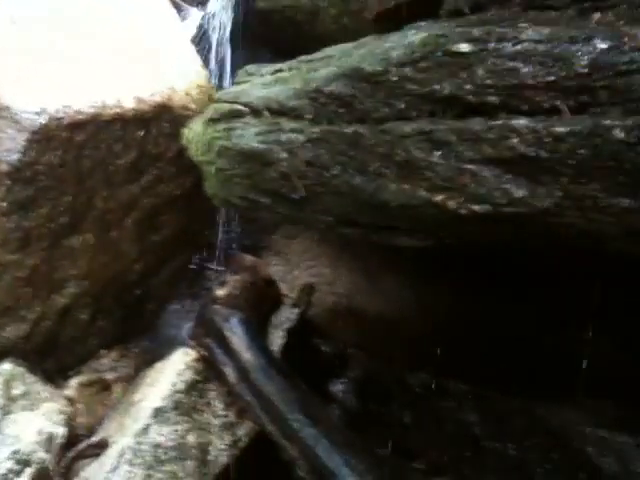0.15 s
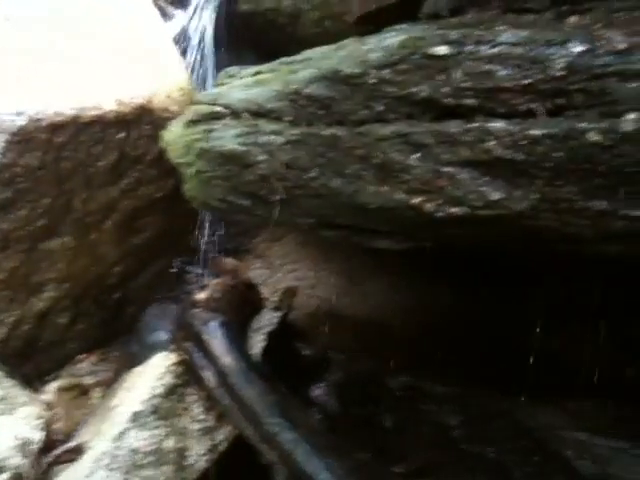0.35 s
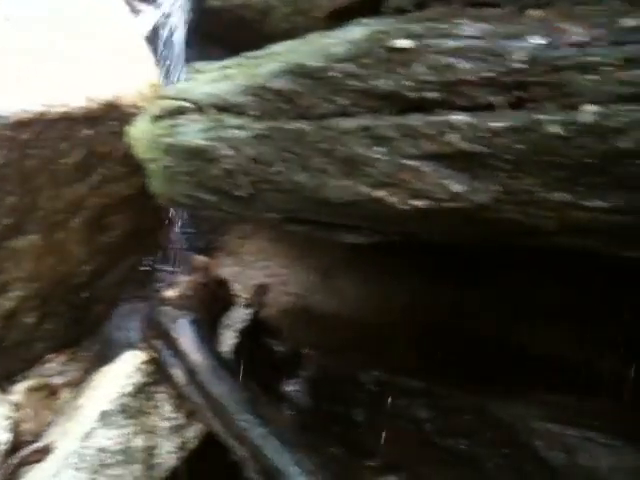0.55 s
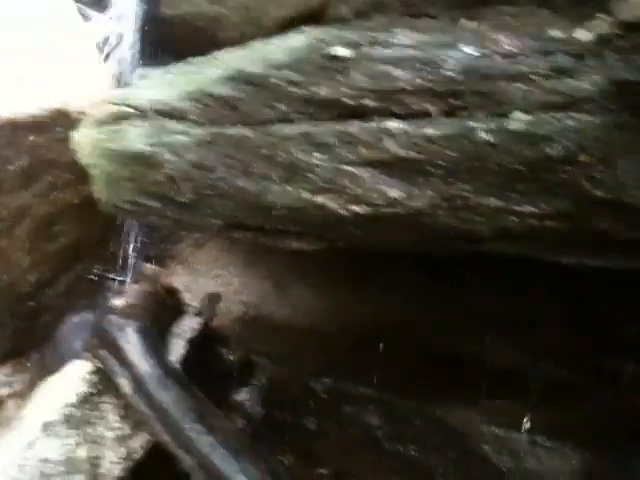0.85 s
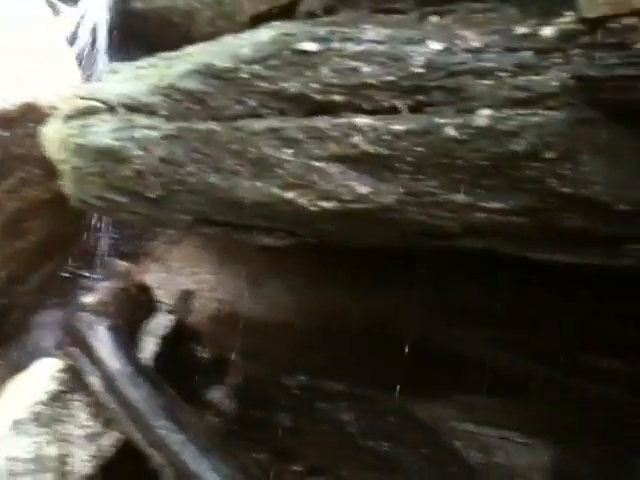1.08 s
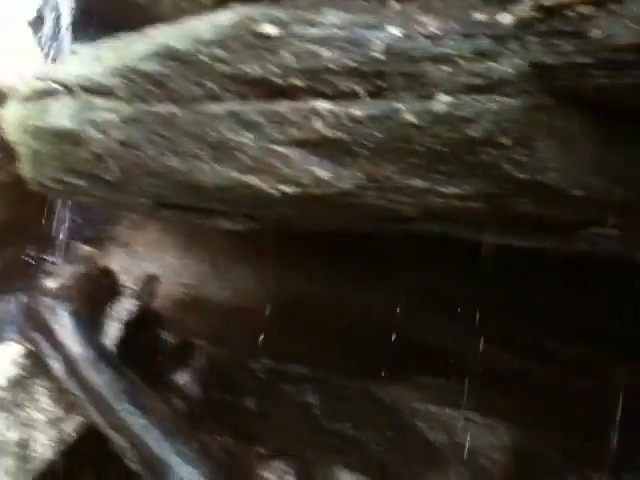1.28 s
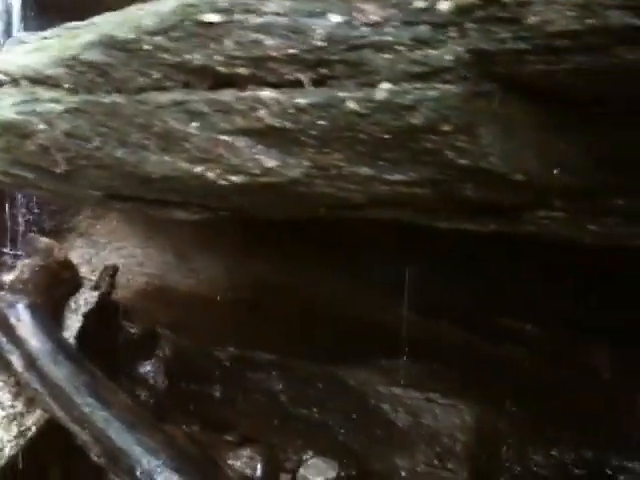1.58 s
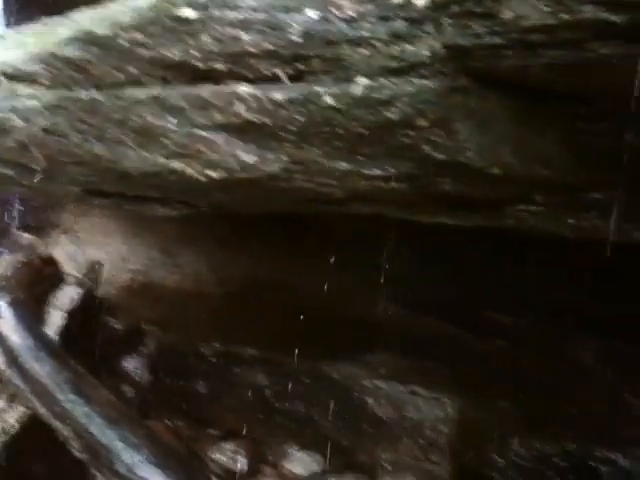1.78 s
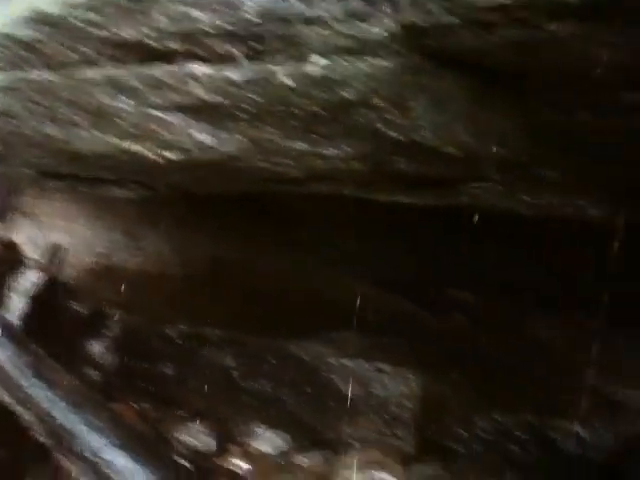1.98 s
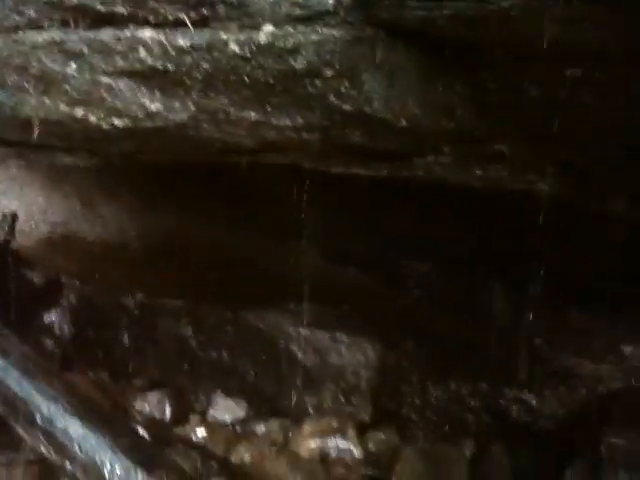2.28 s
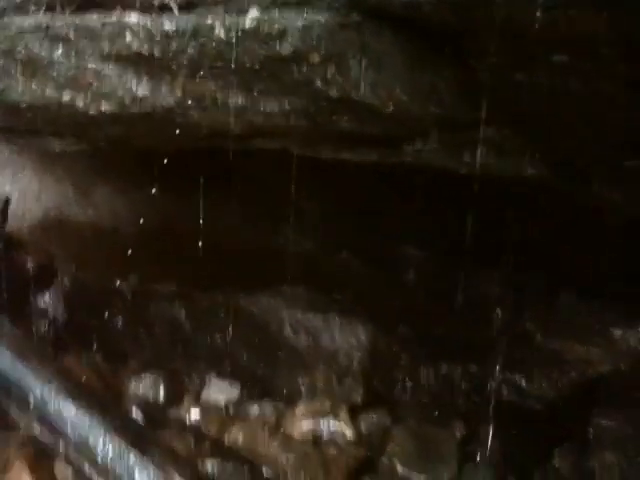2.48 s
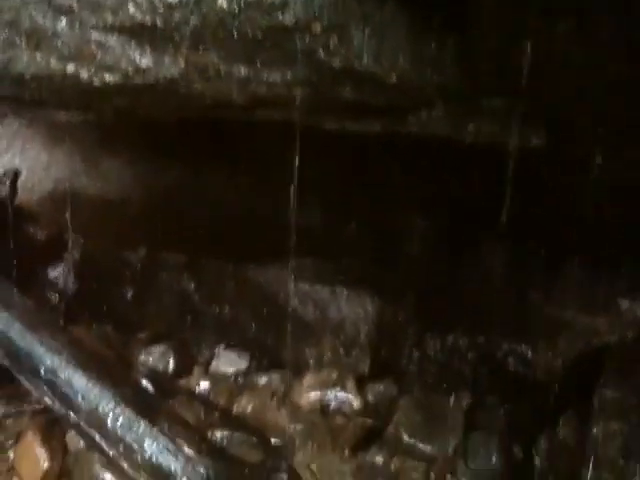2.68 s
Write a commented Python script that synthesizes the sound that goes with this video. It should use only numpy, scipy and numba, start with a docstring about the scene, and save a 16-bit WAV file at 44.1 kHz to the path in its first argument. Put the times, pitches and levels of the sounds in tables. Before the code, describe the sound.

Close trickle of water onto wet stones, fizzy and splashing, with clicking drips and small bubble plops

```python
"""Spring water on wet stones

Spring water trickles off a rock ledge onto wet stones close to a phone.
Shaped noise and thousands of damped sines make the hiss, spray, fizz and clear bubbles of the trickle.
Single drops smack the stones as short sines with an echo and a noise spatter; bubbles plop and gurgle
as gliding sines. Faint low thumps and a brief hum lie beneath."""
import sys
import numpy as np
from scipy import signal
from scipy.fft import rfft, irfft
from scipy.io import wavfile
from scipy.ndimage import uniform_filter1d
from numba import njit

SR = 44100
rng = np.random.default_rng(int(sys.argv[2]) if len(sys.argv) > 2 else 0)


def waveform_to_disk(signal):
    """Save audio, clipped to [-1, 1], as 16-bit WAV at the path in sys.argv[1]."""
    frames = np.transpose(np.atleast_2d(signal))
    scaled = np.clip(frames, -1, 1) * 32767
    samples = np.round(scaled).astype(np.int16)
    wavfile.write(sys.argv[1], SR, samples)


N = 125685  # samples


def undb(db):
    """Decibels: amplitude ratio is a power of ten of level over 20."""
    return 10 ** (np.asarray(db) / 20)


def level(x, db):
    """Root-mean-square level: scale a signal to the given rms in dB."""
    return x * undb(db) / np.sqrt(np.mean(x ** 2))


@njit
def grains(n, start, step, cycles, glide, rise, size):
    """Damped oscillation: sines decay 60 dB over their cycles while their pitch glides upward."""
    out = np.zeros(n)
    for k in range(len(start)):
        first = int(start[k])
        length = cycles[k] / step[k]  # samples; step is cycles per sample
        for j in range(min(int(length), n - first - 1)):
            age = j + 1 - (start[k] - first)  # samples, exact to a fraction
            cycle = age * step[k]
            decay = np.exp(-np.log(1000) * age / length)
            envelope = decay * min(cycle / rise, 1.)
            phase = 2 * np.pi * cycle * (1 + glide[k] * age / length)
            out[first + 1 + j] += size[k] * envelope * np.sin(phase)
    return out


def band(x, hz, width_hz):
    """Resonance: a second-order band-pass favours the sound near its centre."""
    b, a = signal.iirpeak(min(hz, .45 * SR), hz / width_hz, fs=SR)
    return signal.lfilter(b, a, x)


def walk(rate):
    """Random modulation: levels held 1 / rate s, smoothed twice, with zero mean and unit deviation."""
    hold = int(SR / rate)
    steps = np.repeat(rng.standard_normal(N // hold + 1), hold)
    smooth = uniform_filter1d(uniform_filter1d(steps, hold), hold)[:N]
    return (smooth - smooth.mean()) / smooth.std()


# Relative spectrum of the falling water as heard in the hollow
# columns: frequency_hz [Hz], level_db [dB per Hz]
WATER_SPECTRUM = [(24, -60), (50, -53), (80, -40), (110, -29.5), (197, -15), (267, -14.5), (401, -18),
                  (616, -13.5), (972, -12.5), (2080, -6), (3040, -5.5), (4000, -2.5), (5200, 0),
                  (6000, -1.5), (6900, -4), (7900, -9), (9700, -8), (12200, -9.5), (14600, -16),
                  (15500, -21), (17000, -44)]


def colour(x, low_hz):
    """Spectral shaping: flatten the long-term spectrum, impose the water's, and cut below low_hz."""
    f = np.arange(1, N // 2 + 2) * SR / N
    spectrum = rfft(x)
    table_hz, table_db = np.array(WATER_SPECTRUM).T
    power = uniform_filter1d(np.abs(spectrum) ** 2, size=1501)
    own = np.sqrt(power * (1 + (low_hz / f) ** 4))  # the added term makes the low cut
    target = undb(np.interp(np.log(f), np.log(table_hz), table_db))
    return irfft(spectrum / own * target, N)


LARGEST_GRAIN = 2.2  # cap on grain size, times the scatter


def shower(per_s, scatter_db, cycles, glide, low_hz, high_hz):
    """Superposition: damped sines at random moments, pitches, sizes and polarities."""
    moment, pitch, chance, sign = rng.random((20000, 4))[:int(per_s * N / SR)].T
    hz = low_hz * (high_hz / low_hz) ** pitch
    size_db = scatter_db * np.minimum(-np.log(1 - chance), LARGEST_GRAIN)
    size = undb(size_db) * np.sign(sign - .5)
    return grains(N, moment * N, hz / SR, cycles + 0 * hz, glide + 0 * hz, .5, size)


# Low thumps, perhaps a hand on the phone
# columns: start_s [s], level_db [dB, before rise and decay], pitch_hz [Hz]
THUMP_TABLE = [(2.025, -63, 65), (2.175, -54, 60), (2.5, -58, 65), (2.718, -48, 55)]


def thumps():
    """Damped oscillation: each faint thump is a dull swing that dies within 5.1 cycles."""
    start_s, level_db, pitch_hz = np.array(THUMP_TABLE).T
    none = 0 * start_s
    return grains(N, start_s * SR, pitch_hz / SR, 5.1 + none, none, 1., undb(level_db))


HUM_HZ, HUM_WAVER_HZ, HUM_WAVER_DB = 272.6, 5.9, 1.6
# Mean rms level of the hum, around which it wavers
# columns: time_s [s], level_db [dB]
HUM_LEVEL = [(0, -80), (.15, -80), (.2, -58), (.4, -56), (.45, -80), (2.85, -80)]


def hollow():
    """Cavity resonance: a faint low hum, perhaps the air under the ledge, swells for a moment."""
    t = np.arange(N) / SR
    pitch_hz = HUM_HZ + HUM_WAVER_HZ * walk(7.4)
    hum = np.sin(2 * np.pi * np.cumsum(pitch_hz) / SR) * np.sqrt(2)  # unit rms
    time_s, level_db = np.array(HUM_LEVEL).T
    return hum * undb(np.interp(t, time_s, level_db) + HUM_WAVER_DB * walk(11.8))


NEIGHBOUR_DB, FLICKER_DB = .05, 1  # level wander shared by nearby bands, and each band's own


def hiss():
    """Incoherent summation: many far splashes merge into noise whose bands swell and flicker."""
    spectrum = rfft(rng.standard_normal(N))
    octave = np.log2(np.arange(1, N // 2 + 2) * SR / N)
    out, near = 0, walk(9)
    for centre in np.arange(4, 15, .5):  # overlapping triangular bands half an octave apart
        near = (near + walk(11.03)) / np.sqrt(2)
        weight = np.clip(1 - 2 * np.abs(octave - centre), 0, 1)
        part = irfft(spectrum * weight, N)
        out = out + part * undb(NEIGHBOUR_DB * near + FLICKER_DB * walk(22.01))
    return out


# rms levels in the mix before the flow scales it [dB]
HISS_DB, SPRAY_DB, FIZZ_DB, RING_DB = -2.5, -9.5, -11.5, -11
CLUMP_DB, CLUMP_PER_S = 1.5, 8.94  # spray and fizz come in irregular clumps
TILT_HZ = 6500  # where the treble is split off
TREBLE_FOLLOWS, MEAN_FLOW_DB = .5, -26.5  # share of the swell that the treble follows
# How strongly the water splashes, as a gain on the mix
# columns: time_s [s], level_db [dB], treble_lift_db [dB]
FLOW_TABLE = [(0.0, -26, -0.5), (0.05, -28, -2), (0.11, -27, -2), (0.15, -26, 2), (0.2, -26.5, -1),
              (0.26, -27, 2), (0.4, -26.5, -1), (0.55, -27.5, 0.5), (0.62, -26, -0.5), (0.665, -26, 0.5),
              (0.7, -25, -1), (0.74, -27, 0.5), (0.81, -25.5, 1), (0.91, -29, -0.5), (0.96, -25, 0),
              (1.05, -26, 0), (1.14, -25, -1), (1.22, -27, 1.5), (1.34, -25, 0), (1.45, -26.5, -0.5),
              (1.49, -27, 1), (1.54, -26.5, 1), (1.66, -26.5, 1), (1.7, -25.5, 0.5), (1.89, -28, 1),
              (1.99, -26, 0.5), (2.04, -27.5, 2), (2.19, -26.5, 1.5), (2.25, -26.5, 1), (2.29, -26, 3.5),
              (2.41, -26.5, 0.5), (2.48, -25.5, 2.5), (2.53, -26.5, 3), (2.6, -25.5, 1.5), (2.67, -25.5, 2),
              (2.85, -26.5, -1.5)]


def trickle():
    """Superposition: hiss, spray, fizz and clear bubbles rise and fall with the flow."""
    spray = shower(3000, 1.5, cycles=3.6, glide=0., low_hz=900, high_hz=9000)
    spray = band(colour(spray, 900), 3500, 4000) * undb(CLUMP_DB * walk(CLUMP_PER_S))
    fizz = shower(900, 2, cycles=28, glide=.18, low_hz=440.6, high_hz=8980)
    fizz = fizz * undb(CLUMP_DB * walk(CLUMP_PER_S))
    fizz = band(colour(fizz, 530), 1800, 4800)
    ring = shower(250, 2.5, cycles=204, glide=.022, low_hz=588, high_hz=8260)  # small clear bubbles
    ring = band(colour(ring, 440), 2100, 6400)
    water = level(colour(hiss(), 1), HISS_DB) + level(spray, SPRAY_DB)
    water = water + level(fizz, FIZZ_DB) + level(ring, RING_DB)

    t = np.arange(N) / SR
    time_s, level_db, treble_lift_db = np.array(FLOW_TABLE).T
    flow_db = np.interp(t, time_s, level_db)
    lift_db = np.interp(t, time_s, treble_lift_db)
    treble_db = MEAN_FLOW_DB + TREBLE_FOLLOWS * (flow_db - MEAN_FLOW_DB) + lift_db
    low = signal.filtfilt(*signal.butter(2, TILT_HZ, fs=SR), water)
    return low * undb(flow_db) + (water - low) * undb(treble_db)


CLUSTER_SPREAD = .3  # octaves either side of the pitch
CLUSTER_CYCLES, CLUSTER_GLIDE, CLUSTER_SCATTER_DB = 18, .13, 1
# Clusters of small splashes and gurgles
# columns: middle_s [s], length_s [s], pitch_hz [Hz], level_db [dB rms over the length]
CLUSTER_TABLE = [(0.164, 0.038, 2800, -36), (0.346, 0.022, 4230, -36), (0.491, .06, 2800, -34.5),
                 (0.616, .05, 2460, -35), (0.697, 0.029, 2800, -33), (0.811, 0.063, 4400, -35),
                 (0.953, .04, 4240, -47), (1.132, 0.028, 3950, -35), (1.409, 0.08, 718, -49),
                 (1.464, 0.027, 1150, -46), (1.63, 0.092, 630, -47), (1.624, .05, 1060, -45),
                 (1.995, 0.032, 1900, -38.5), (2.0, .04, 268, -53), (2.086, .04, 4800, -34),
                 (2.455, .03, 5200, -35), (2.49, 0.029, 5170, -29), (2.259, 0.043, 300, -50),
                 (2.72, 0.094, 231, -56), (2.767, 0.028, 776, -45.5)]


def clusters():
    """Bubble resonance: each cluster is a bunch of bubbles of like pitch, crowded in time."""
    out = np.zeros(N)
    for middle_s, length_s, pitch_hz, level_db in CLUSTER_TABLE:
        count = max(4, int(length_s * pitch_hz / 3))  # at most the 60 drawn
        early, late, detune, chance = rng.random((60, 4))[:count].T
        start_s = middle_s + length_s * (early + late - 1.1)  # two draws crowd the moments
        hz = pitch_hz * 2 ** (CLUSTER_SPREAD * (2 * detune - 1))
        size = undb(-CLUSTER_SCATTER_DB * np.log(1 - chance))
        bunch = grains(N, start_s * SR, hz / SR, CLUSTER_CYCLES + 0 * hz,
                       CLUSTER_GLIDE + 0 * hz, .94, size)
        out += bunch * undb(level_db) * np.sqrt(length_s * SR / np.sum(bunch ** 2))
    return out


PLOP_RISE_CYCLES = 4.
# Bubbles caught by a drop
# columns: start_s [s], level_db [dB, before rise and decay], pitch_hz [Hz],
# fade_cycles [cycles to fall 60 dB], glide [upward share of the pitch]
PLOP_TABLE = [(.053, -37.5, 633, 64, .05), (.525, -40, 623, 70, 0.027), (.595, -39, 271, 30, 0.018),
              (1.085, -3, 1680, 16.7, 0.027), (1.0855, -8, 2400, 14, 0.22), (1.087, -18, 3500, 19, .1),
              (1.347, -11, 4000, 48, .02), (2.1815, -11, 3900, 47, 0.081), (2.185, -20, 4300, 34, .5),
              (1.518, -11.5, 2860, 23, .05), (1.846, -21, 3600, 90, .02), (1.926, -29, 3800, 81, .05),
              (2.011, -26, 3800, 120, .02), (2.178, -27.5, 567, 18, 0.067), (2.321, -14, 2540, 20, 0.3),
              (2.323, -21, 1990, 25, .1), (2.401, -25.5, 874, 55, 0.026)]


def plops():
    """Bubble resonance: single trapped bubbles ring and glide upward as they fade."""
    start_s, level_db, pitch_hz, fade_cycles, glide = np.array(PLOP_TABLE).T
    return grains(N, start_s * SR, pitch_hz / SR, fade_cycles, glide, PLOP_RISE_CYCLES, undb(level_db))


SMACK_CYCLES, SMACK_RISE_CYCLES = 5.2, .9
ECHO_S, ECHO_DB = .0021, -5
SPATTER_WIDTH = .6  # share of the pitch
SPATTER_T60_S = .11
QUICK_T60_S, QUICK_DB = .015, -2  # a faster decay added to the start of the spatter
# Drops on stone
# columns: start_s [s, end of the smack's rise], level_db [dB at that moment, before the low cut],
# pitch_hz [Hz], spatter_db [dB rms, before fade and low cut]
DROP_TABLE = [(.2412, -17, 5000, -30), (.4864, -21, 3400, -36), (.5121, -14, 4400, -31),
              (.6299, -18, 4000, -29), (.9397, -16, 4500, -29), (1.0850, -17, 4500, -36),
              (1.3469, -9.5, 4500, -27), (1.3617, -15, 5000, -32), (1.4248, -18, 8000, -34),
              (1.4706, -13, 4200, -27), (1.4775, -7.5, 5000, -26), (1.4929, -13, 4800, -24),
              (1.5050, -17, 4500, -27), (1.8094, -16, 5000, -35), (1.8568, -15, 5500, -35),
              (1.9855, -15, 5000, -30), (2.1808, -6, 4900, -25), (2.2846, -10, 5400, -30),
              (2.3237, -12, 3300, -30), (2.3540, -20, 11000, -31), (2.4742, -14, 5000, -28),
              (2.7162, -4.5, 5200, -28)]


def drops():
    """Impact and reflection: a smack, its echo off the rock, then a spatter of the same colour."""
    start_s, level_db, pitch_hz, spatter_db = np.array(DROP_TABLE).T
    none = 0 * start_s
    onset_s = start_s - SMACK_RISE_CYCLES / pitch_hz
    size = undb(level_db + 60 * SMACK_RISE_CYCLES / SMACK_CYCLES)  # makes up the decay during the rise
    smack = grains(N, onset_s * SR, pitch_hz / SR, SMACK_CYCLES + none, none, SMACK_RISE_CYCLES, size)
    echo = band(np.roll(smack, int(ECHO_S * SR)), 4000, 2500)
    out = smack + undb(ECHO_DB) * echo

    t = np.arange(4000) / SR
    fade = undb(-60 * t / SPATTER_T60_S) + undb(QUICK_DB - 60 * t / QUICK_T60_S)
    for start, hz, db in zip(start_s, pitch_hz, spatter_db):
        burst = band(rng.standard_normal(len(t)), hz, SPATTER_WIDTH * hz)
        burst = level(band(burst, hz, 2 * SPATTER_WIDTH * hz), db)
        i = int(start * SR)
        out[i:i + len(t)] += (burst * fade)[:N - i]
    low_cut = signal.butter(2, 1200, "high", fs=SR, output="sos")
    return signal.sosfilt(low_cut, out)


def scene():
    """Superposition: the pressures of all sources add at one microphone."""
    background = thumps() + hollow()
    water = trickle() + clusters() + plops() + drops()
    return (background + water)[None]


def record(dry):
    """Band limiting: the phone cuts the top above 17.2 kHz with a steep elliptic low-pass."""
    top_cut = signal.ellip(10, .2, 80, 17200, fs=SR, output="sos")
    return signal.sosfilt(top_cut, dry)


dry = scene()
out = record(dry)
waveform_to_disk(out)
```